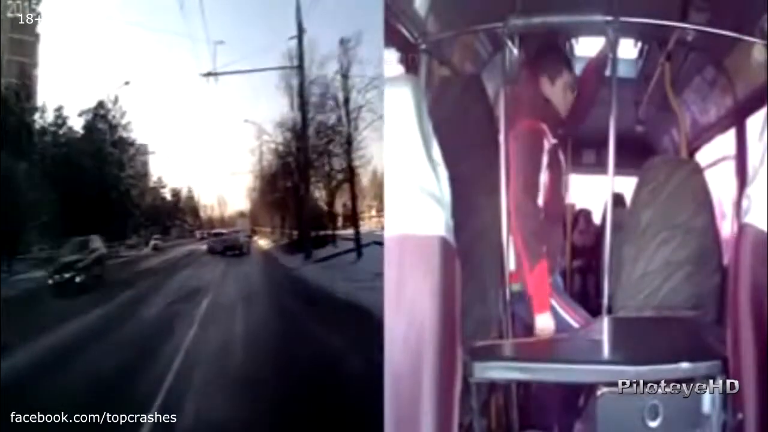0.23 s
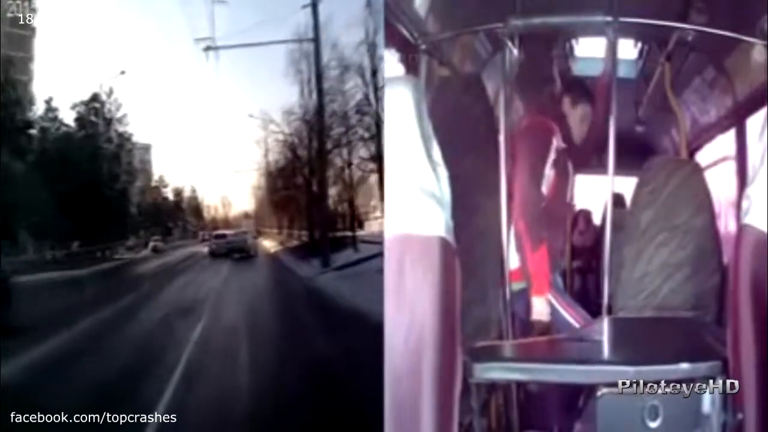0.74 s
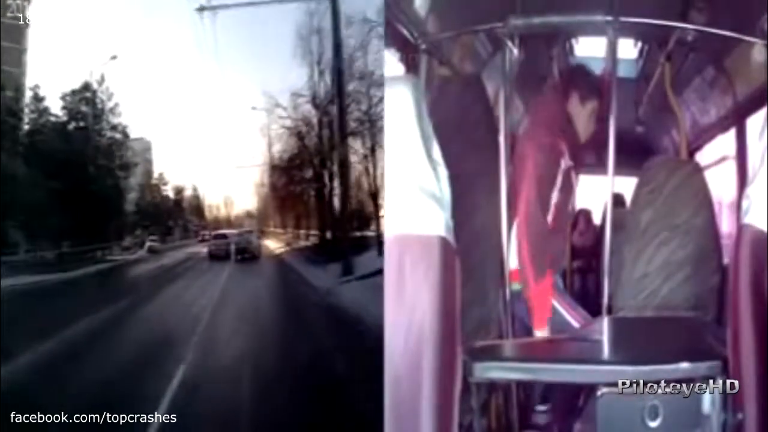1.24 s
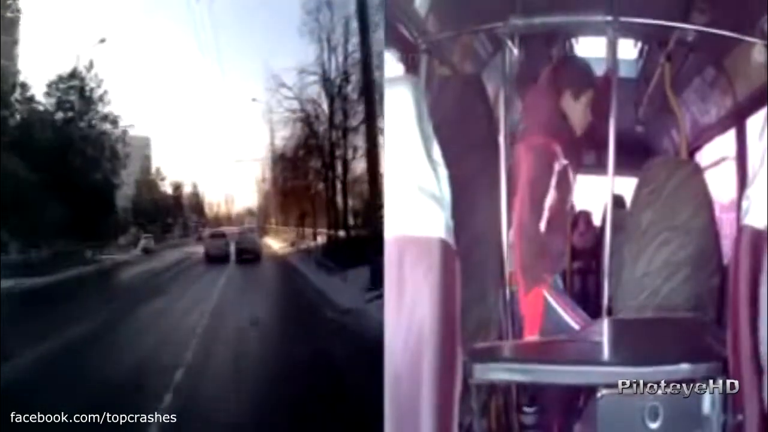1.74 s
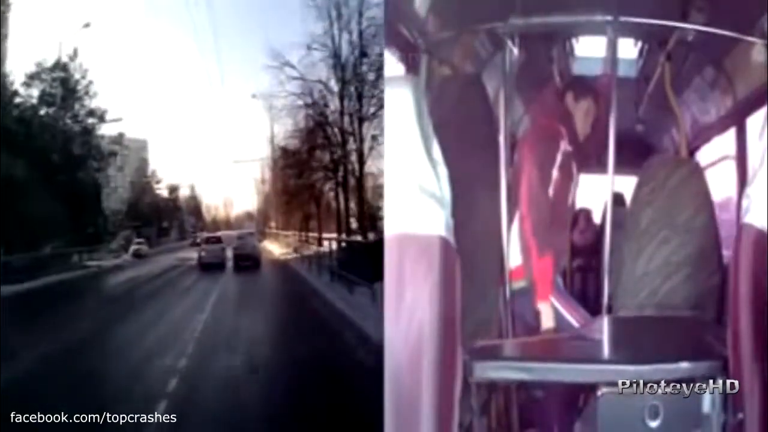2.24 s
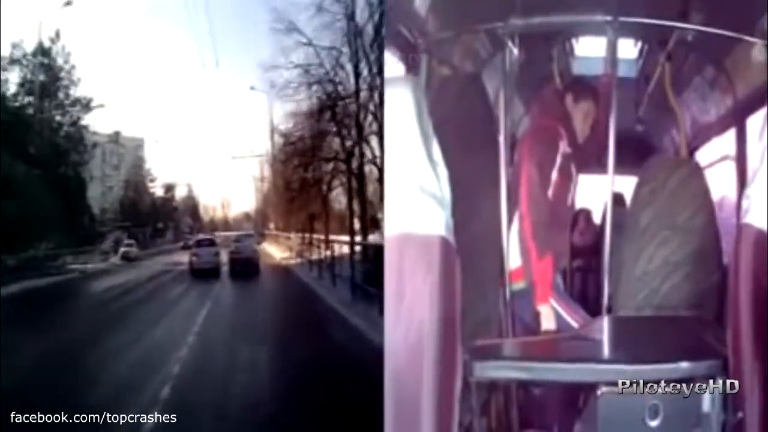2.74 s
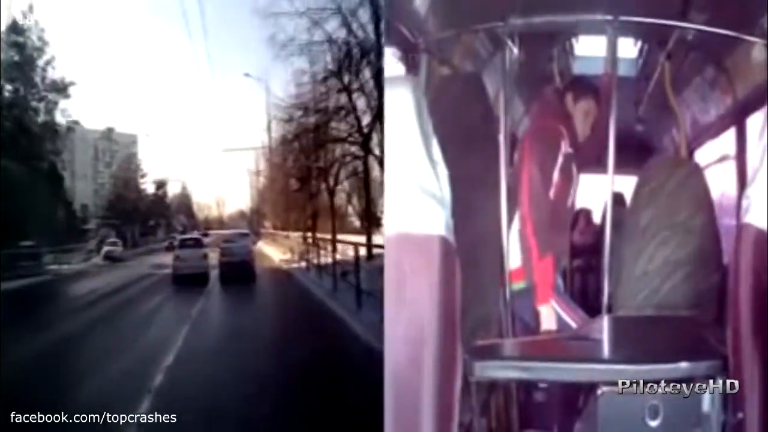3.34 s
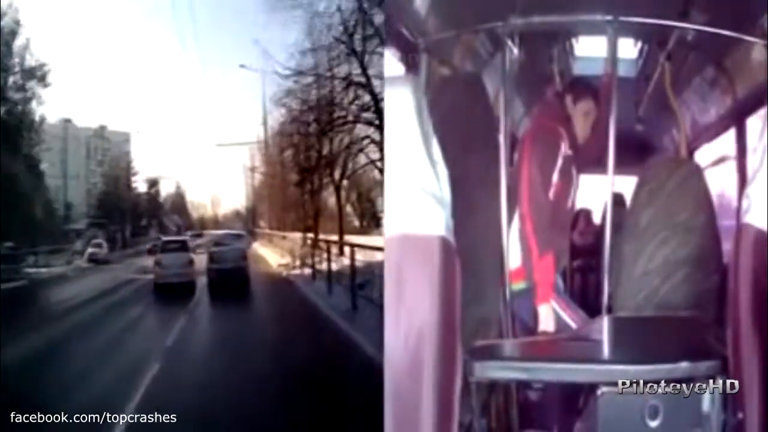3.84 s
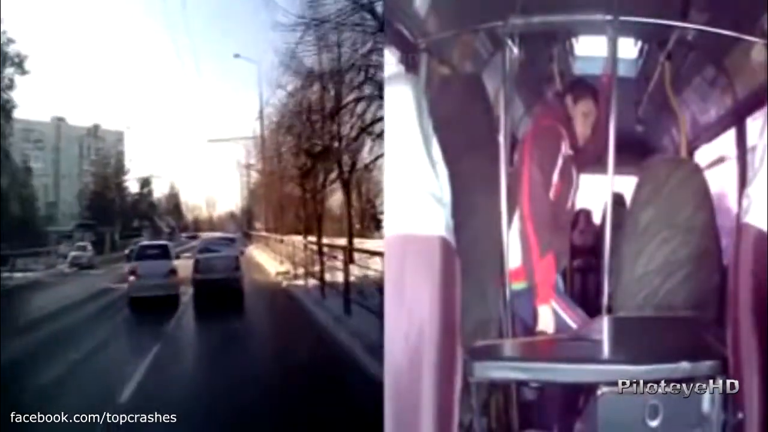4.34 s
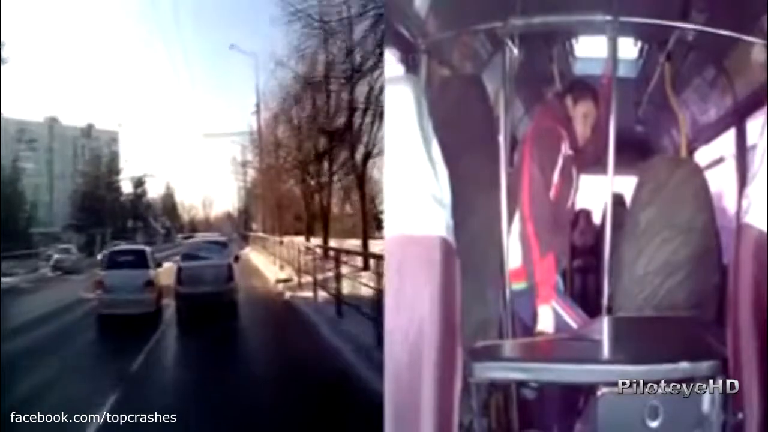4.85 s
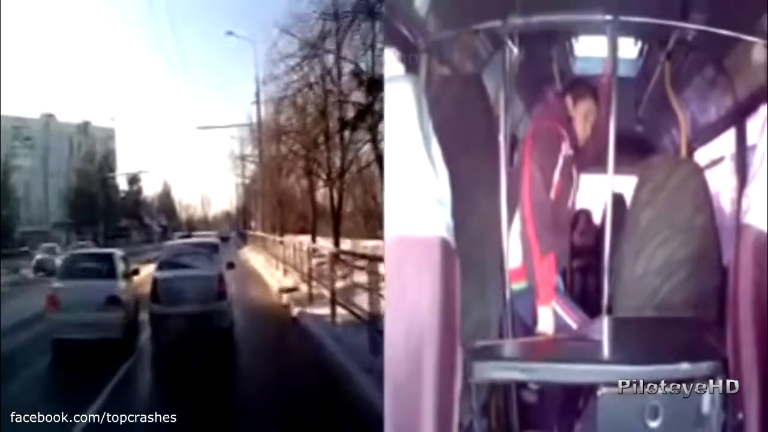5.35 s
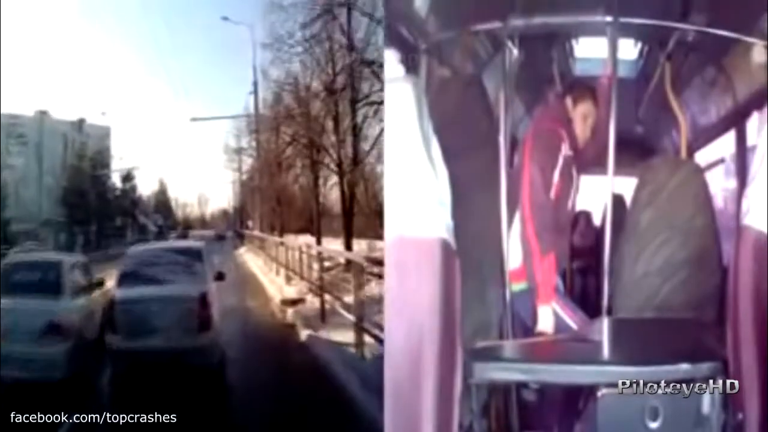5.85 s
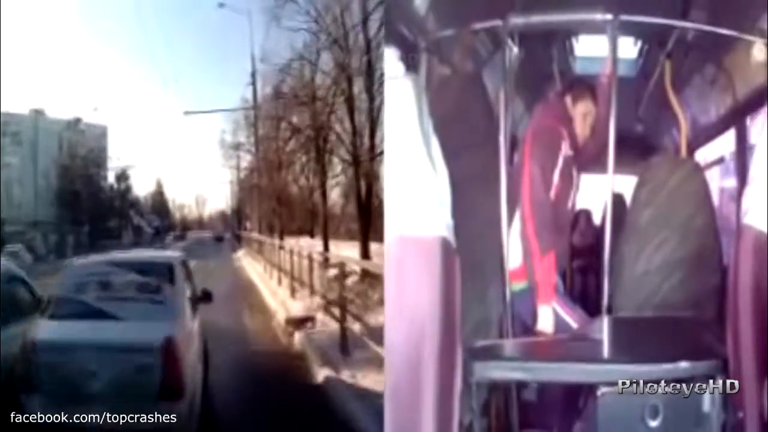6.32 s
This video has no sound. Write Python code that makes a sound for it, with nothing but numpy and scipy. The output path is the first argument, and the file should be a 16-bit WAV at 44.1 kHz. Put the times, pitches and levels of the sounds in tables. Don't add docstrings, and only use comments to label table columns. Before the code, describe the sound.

Inside a bus on a rough road, deep uneven body boom and tyre roar mix with falling engine drones, a short brake squeak and loose rattles. Oncoming cars brush past as soft whooshes. The bus slows and the roar darkens. Late on, the driver brakes hard and stabs a two-tone horn eight times, the first longest. A small camera microphone in the cabin overloads and turns gritty.

```python
import sys
import numpy as np
from scipy import signal
from scipy.fft import rfft, irfft, next_fast_len
from scipy.io import wavfile
from scipy.ndimage import uniform_filter1d, map_coordinates

SR = 44100
rng = np.random.default_rng(int(sys.argv[2]) if len(sys.argv) > 2 else 0)


def elevation(decibels):
    levels = np.asarray(decibels, float)
    return 10 ** (levels / 20)


def master(y):
    cut = np.clip(np.atleast_2d(y).T, -1, 1)
    pcm = np.round(cut * 32767)
    wavfile.write(sys.argv[1], SR, pcm.astype(np.int16))


N = 290178


def unit(x):
    return x / np.sqrt(np.mean(x ** 2) + 1e-20)


def curves(rows):
    s, *cols = np.transpose(rows)
    return [np.interp(np.arange(N) / SR, s, c) for c in cols]


def wobble(rate_hz):
    knots = rng.standard_normal(int(N * rate_hz / SR) + 4)
    return map_coordinates(knots, [np.arange(N) * rate_hz / SR])


def noise(spectrum, patchy_db):
    z = signal.stft(rng.standard_normal(N), nperseg=512)[2]
    field = uniform_filter1d(rng.standard_normal(z.shape), size=5, axis=0)
    field = uniform_filter1d(field, size=10, axis=1)
    patchy = signal.istft(z * elevation(patchy_db * unit(field)), nperseg=512)[1][:N]
    m = next_fast_len(N + 8192)
    hz, db = np.transpose(spectrum)
    bin_hz = np.fft.rfftfreq(m, 1 / SR)
    gain = elevation(np.interp(np.log(bin_hz + 1), np.log(hz + 1), db, -120, -120))
    return unit(irfft(rfft(patchy, m) * gain, m)[:N])


def tone(rows, unsteady_db, rate_hz):
    t = np.arange(N) / SR
    hz, db = curves(rows)
    fade_s = 0.018
    edge = np.clip(np.minimum(t - rows[0][0], rows[-1][0] - t) / fade_s + 1, 0, 1)
    level = edge * elevation(db + unsteady_db * wobble(rate_hz))
    return np.sqrt(2) * level * np.sin(2 * np.pi * np.cumsum(hz) / SR)


def bells(rows):
    s, _, length_s = np.transpose(rows)
    t = np.arange(0, N, 50)[:, None] / SR
    return np.exp(-(2 * (t - s) / length_s) ** 2)


def spread(slow):
    return np.interp(np.arange(N), np.linspace(0, N, len(slow)), slow)


def lift(rows):
    return spread(bells(rows) @ np.transpose(rows)[1])


def braking():
    pedal_s, bite_s = 5.18, 0.63
    return np.clip((np.arange(N) / SR - pedal_s) / bite_s, 0, 1)


def flutter():
    tap_hz = 30 * (1 + .08 * wobble(6))
    return np.sin(2 * np.pi * np.cumsum(tap_hz) / SR)


# frequency in Hz, level in dB per Hz.
SEAL_SPECTRUM = [(7600, -38.5), (8200, -2.5), (9600, -3), (10400, -14), (10900, -47)]


def seal():
    level_db = -68 + 5 * flutter() + 1.5 * wobble(20)
    return elevation(level_db) * noise(SEAL_SPECTRUM, patchy_db=2.5)


# start in seconds, peak in dB, t60 in seconds.
RATTLE_HITS = [(0.016, -28, 0.022), (2.3944, -29, 0.1), (2.616, -18, 0.037), (2.6286, -19, 0.13),
               (2.6527, -40, 0.18), (3.0712, -38, 0.068), (3.3776, -30, 0.036), (3.398, -31, 0.049),
               (4.7153, -30, 0.13), (4.999, -26, 0.098), (5.031, -28, 0.092), (5.087, -27, 0.07),
               (5.1185, -28, 0.057), (5.177, -17.5, 0.11), (5.2055, -25.5, 0.081), (5.7006, -31, 0.06)]
# frequency in Hz, level in dB per Hz.
FITTINGS_SPECTRUM = [(250, -12), (700, 0), (1700, -4), (2300, -9), (3200, -3), (3800, -10), (4800, -22),
                     (6000, -17), (7000, -28), (10000, -42)]


def rattles():
    shake, t = np.zeros(N + SR), np.arange(SR // 4) / SR
    rise_s = 0.0022
    for start_s, db, t60_s in RATTLE_HITS:
        decay = elevation(db - 10.5 - 60 * t / np.clip(t60_s, .005, .3))
        shake[round(start_s * SR):][:len(t)] += decay * (1 - np.exp(-t / rise_s))
    return shake[:N] * noise(FITTINGS_SPECTRUM, patchy_db=1.5)


# time in seconds, pitch in Hz, level in dB.
EARLY_SQUEAK = [(.025, 4940, -58), (.037, 4860, -41), (.05, 4780, -60), (.09, 4690, -51), (.15, 4620, -51),
                (.22, 4600, -55), (.25, 4480, -66)]
SLOWING_SQUEAK = [(4.35, 4640, -66), (4.45, 4670, -68), (4.7, 4547, -67), (4.85, 4533, -74)]


def squeaks():
    early = tone(EARLY_SQUEAK, unsteady_db=1.2, rate_hz=40)
    late = tone(SLOWING_SQUEAK, unsteady_db=1.5, rate_hz=25)
    return early + elevation(7 * flutter() - 2) * late


# time in seconds, share of the early pace.
PACE = [(0, 1.06), (1.1, 0.97), (1.9, .85), (2.3, 0.44), (2.9, 0.031), (3.5, 0.49), (4.3, -0.00077),
        (5.2, -0.17), (6.58, 0.58)]
# middle in seconds, lift in dB, length in seconds.
ROAD_RUTS = [(.04, 10, 0.052), (2.0, 6, 0.13), (2.645, 11.5, 0.1), (2.88, 7, 0.058), (3.11, 10, 0.077),
             (3.3, 8, 0.23), (3.6, 2, 0.52), (3.84, 4, 0.36), (4.03, 5.5, 0.16), (4.17, 5, 0.18),
             (4.4, 6, 0.3), (4.78, 8.5, 0.22), (5.16, 5.5, 0.076), (5.7, 3, 0.061), (6.0, -0.5, 0.31),
             (6.2, 1.5, .1), (6.54, 6, 0.18)]
# slow level in dB, gain at the early pace in dB, share of a rut,
# gain under braking in dB.
ROAD_LAYERS = [
    (-19, -1, .3, 5),
    (-25, 2.5, 1.1, 9),
    (-33, 3.5, .6, 12),
    (-48, 9, .3, 12),
    (-59, 7, .2, -3),
]


def layer_levels_db():
    (pace,), ruts, brake = curves(PACE), lift(ROAD_RUTS), braking()
    return [db + fast * pace + share * ruts + more * brake for db, fast, share, more in ROAD_LAYERS]


def slowing(fast, slow):
    start_s, length_s = 1.8, 1.0
    turn = np.pi / 2 * np.clip((np.arange(N) / SR - start_s) / length_s, 0, 1)
    return np.cos(turn) * fast + np.sin(turn) * slow


# frequency in Hz, level in dB per Hz.
AIR_SPECTRUM = [(3300, -37.5), (3900, -7.5), (4600, -2.5), (5200, -6), (7500, -6), (9000, -13.5),
                (10300, -23), (10800, -30.5), (14200, -35), (14900, -72.5)]
# middle in seconds, lift in dB, length in seconds.
ONCOMING_CARS = [
    (.28, 3.5, 0.29),
    (.7, 4.5, 0.28),
    (1.63, 6.5, 0.45),
]


def air(level_db, bumps):
    return elevation(level_db + lift(ONCOMING_CARS) + 1.6 * bumps) * noise(AIR_SPECTRUM, patchy_db=1.5)


# frequency in Hz, level in dB per Hz.
HISS_AT_SPEED = [(710, -32), (1200, 0), (1450, 2), (1670, 2.5), (1930, -6), (2250, -5), (2470, -7.5),
                 (3430, -4), (3680, -6.5), (4780, -53.5), (8100, -120)]
HISS_SLOWING = [(710, -32.5), (1200, -10), (1390, 0), (1500, -3), (1910, -8.5), (2080, -8), (2560, -13),
                (3090, -8), (3680, -14.5), (4780, -53.5), (8100, -120)]


def tyre_hiss(level_db, bumps):
    hiss = slowing(noise(HISS_AT_SPEED, patchy_db=2.0), noise(HISS_SLOWING, patchy_db=1.65))
    return elevation(level_db + 0.2 * bumps) * hiss


# frequency in Hz, level in dB per Hz.
ROAR_AT_SPEED = [(140, -47), (230, -9.5), (264, 1), (312, -5), (405, 0), (502, -6.5), (605, -6), (662, -13),
                 (720, -8.5), (1060, -11.5), (1200, -28), (1560, -71), (2640, -120)]
ROAR_SLOWING = [(140, -40), (230, -9.5), (262, -2), (371, -7.5), (459, -6.5), (531, -12.5), (610, -13.5),
                (644, -14.5), (705, -13.5), (798, -12.5), (1200, -22.5), (1560, -47.5), (2640, -120)]


def tyre_roar(level_db, bumps):
    roar = slowing(noise(ROAR_AT_SPEED, patchy_db=1.2), noise(ROAR_SLOWING, patchy_db=-2.66))
    return elevation(level_db + 0.7 * bumps) * roar


# frequency in Hz, level in dB per Hz.
THUD_SPECTRUM = [(7.1, -25.5), (12, -26.5), (32, 2.5), (40, 8.5), (54, -1), (72, -2.5), (90, -30),
                 (120, -48), (200, -120)]
RUMBLE_SPECTRUM = [(53, -23), (90, -3), (167, -8), (230, -19.5), (300, -43), (510, -120)]


def thud_and_rumble(thud_db, rumble_db, bumps):
    thud = elevation(thud_db + 1.4 * wobble(6)) * noise(THUD_SPECTRUM, patchy_db=0.9)
    return thud + elevation(rumble_db + .5 * bumps) * noise(RUMBLE_SPECTRUM, patchy_db=.6)


def road():
    thud_db, rumble_db, roar_db, hiss_db, air_db = layer_levels_db()
    bumps = wobble(8.9)
    low = thud_and_rumble(thud_db, rumble_db, bumps)
    high = tyre_roar(roar_db, bumps) + tyre_hiss(hiss_db, bumps) + air(air_db, bumps)
    return low, high


# time in seconds, pitch in Hz, level in dB.
ENGINE_DRONE = [(0, 164.9, -24.5), (.3, 163.5, -22), (.6, 162.5, -26.5), (.8, 159.5, -27), (1.1, 156, -47),
                (1.4, 152.9, -44), (1.7, 153, -25.5), (1.9, 152, -24)]
AXLE_DRONE = [(0, 198.4, -31), (.5, 194.4, -31), (1, 191.6, -35.5), (1.5, 186.5, -33.5), (1.75, 182, -31),
              (1.9, 176.7, -52)]


def drones():
    engine = tone(ENGINE_DRONE, unsteady_db=1.8, rate_hz=12)
    return engine + tone(AXLE_DRONE, unsteady_db=2.5, rate_hz=8)


def lugging(firing_hz):
    turn = 2 * np.pi * np.cumsum(firing_hz) / SR
    second = elevation(-15 + 2.4 * wobble(6)) * np.sin(2 * turn)
    third = elevation(-11 + 2.4 * wobble(6)) * np.sin(3 * turn)
    return np.sqrt(2) * braking() * (second + third)


def swinging(hz, swells, wander):
    rest_db = -29.5
    power = bells(swells) ** 2 @ elevation(np.transpose(swells)[1]) ** 2
    size = np.sqrt(power + elevation(rest_db) ** 2)
    turn = 2 * np.pi * np.cumsum(hz * (1 + wander * wobble(5))) / SR
    return np.sqrt(2) * spread(size) * np.sin(turn)


# time in seconds, rate in Hz.
FIRING_RATE = [(0, 31.27), (1.6, 30.67), (2.1, 28.34), (3.2, 28.36), (3.7, 26.79), (4.05, 23.72),
               (4.6, 25.09), (5.1, 26.95), (5.35, 24.41), (6.1, 21.63), (6.4, 23.32), (6.58, 26)]
# middle in seconds, rms in dB, length in seconds.
BODY_BOOM = [(0.248, -8.5, 0.086), (1.12, -15, 0.9), (1.56, -11.5, 0.91), (1.817, -6.5, 0.11),
             (2.073, -2, 0.21), (2.39, -7, 0.48), (2.625, -11, 0.28), (3.16, -8.5, 0.67), (3.72, -8, 0.22),
             (4.05, -7, 0.5), (4.63, -6.5, 0.42), (5.023, -10, 0.32), (5.377, 7, 0.2), (5.825, 0, 0.37),
             (6.074, -2.5, 0.18), (6.213, 2.5, 0.067), (6.44, 3, 0.3)]
AXLE_SWINGS = [(.26, -15, 1), (1.04, -20.5, 0.37), (1.55, -14.5, 0.36), (2.14, -6, 0.31), (2.78, -11, 0.57),
               (3.37, 1.5, 0.081), (3.63, -17, 1), (4.95, -12, 0.23), (6.4, -12.5, 0.54)]
ROOF_SWINGS = [(.23, -9, 0.055), (.41, -14.5, 0.16), (0.921, -18, 0.52), (1.41, -11.5, .18),
               (1.86, -16.5, 0.59), (2.28, -11, 0.24), (2.61, -7.5, 0.37), (2.86, -15, 0.18),
               (4.56, -13.5, 0.15), (4.89, -17, 0.098), (5.27, -9, .12), (5.501, -7, .12), (6.51, -11, 0.1)]
FLOOR_SWINGS = [(.16, -24, 0.23), (.5, -18.5, 0.66), (1.2, -18, 0.42), (3.25, -16, 0.11), (3.87, -19, 0.14),
                (4.071, -8.5, 0.08), (4.5, -23, 0.14), (5.2, -19.5, 0.19)]


def body():
    firing_hz, = curves(FIRING_RATE)
    floor_hz = 63.55 + 2 * np.arange(N) / SR
    boom = swinging(firing_hz, BODY_BOOM, wander=0.0093)
    axle = swinging(21, AXLE_SWINGS, wander=0.0404)
    roof = swinging(51.08, ROOF_SWINGS, wander=0.0295)
    floor = swinging(floor_hz, FLOOR_SWINGS, wander=0.0189)
    return boom + axle + roof + floor + lugging(firing_hz) + drones()


# frequency in Hz, level in dB per Hz.
BUZZ_SPECTRUM = [(300, -7.5), (900, 2.5), (1700, -3), (2300, -10), (3200, -10.5), (3800, -16.5),
                 (6000, -22), (9000, -24.5), (12000, -45)]


def buzz(drive, window, patchy_db):
    size = np.sqrt(np.abs(uniform_filter1d(drive ** 2, size=window)))
    return size * noise(BUZZ_SPECTRUM, patchy_db)


# down in seconds, up in seconds, strength in dB.
HORN_PRESSES = [
    (5.22, 5.424, -2.4),
    (5.533, 5.625, -2),
    (5.728, 5.83, -2.5),
    (5.896, 5.979, -1.6),
    (6.049, 6.132, -2.5),
    (6.219, 6.357, -2.3),
    (6.42, 6.473, -2.5),
    (6.54, 6.650, -4.5),
]


def trumpet(pitch_hz, partials, rise_s, lag_s, flat, sharp):
    out, t = np.zeros(N + SR), np.arange(SR // 2) / SR
    for down_s, up_s, db in HORN_PRESSES:
        released = t - (up_s - down_s)
        after = np.maximum(released - lag_s, 0)
        bend = 1 - flat * np.exp(-t / 0.046) + sharp * np.clip(released / 0.039, 0, 1)
        bend = bend + .0015 * wobble(150)[:len(t)]
        turn = 2 * np.pi * (np.cumsum(pitch_hz * bend) / SR + rng.random())
        swing = 1 - np.exp(-(t / rise_s) ** 2)
        blast = np.zeros(len(t))
        for k, level_db, t60_s in partials:
            size = swing ** k * elevation(level_db - 60 * after / t60_s)
            blast += size * np.sin(k * turn + k * k)
        out[round(down_s * SR):][:len(t)] += np.sqrt(2) * elevation(db) * blast
    return out[:N]


# multiple of the pitch, rms in dB, t60 after release in seconds.
HIGH_PARTIALS = [(1, 0.5, 0.086), (2, -8.5, 0.23), (3, -25, 0.19), (4, -12.5, 0.12), (5, -25.5, 0.055),
                 (6, -28, 0.12), (7, -39, 0.065), (8, -41, 0.073)]
LOW_PARTIALS = [(1, -8.5, 0.33), (2, -3.5, 0.23), (3, -17, 0.2), (4, -17, 0.13), (5, -21, 0.043),
                (6, -26, 0.071), (7, -23.5, 0.14), (8, -28.5, 0.083)]


def horn():
    high = trumpet(485.5, HIGH_PARTIALS, rise_s=0.015, lag_s=0.00067, flat=0.011, sharp=0.027)
    low = trumpet(399, LOW_PARTIALS, rise_s=0.018, lag_s=0.01, flat=0.0159, sharp=0.011)
    both = high * elevation(0.48 * wobble(40)) + low * elevation(0.23 * wobble(44))
    return both + elevation(-15) * buzz(both, window=400, patchy_db=-2.0)


def scene():
    shaking, tyres = road()
    travel = np.where(braking() > 0, 1.6, 1.15)
    shaking = travel * np.tanh((shaking + body()) / travel)
    return (seal() + rattles() + squeaks() + tyres + shaking + horn())[None]


def top_cut(x):
    return signal.sosfilt(signal.butter(12, 15800, fs=SR, output="sos"), x)


def record(dry):
    top, knee = .825, 9
    squashed = dry / (1 + np.abs(dry / top) ** knee) ** (1 / knee)
    edges = np.diff(squashed, prepend=0)
    gritty = squashed + elevation(-17) * buzz(edges, window=1000, patchy_db=1.5)
    pole = np.exp(-2 * np.pi * 9500 / SR)
    dull = signal.lfilter([1 - pole], [1, -pole], gritty)
    return top_cut(dull)


dry = scene()
out = record(dry)
master(out)
```